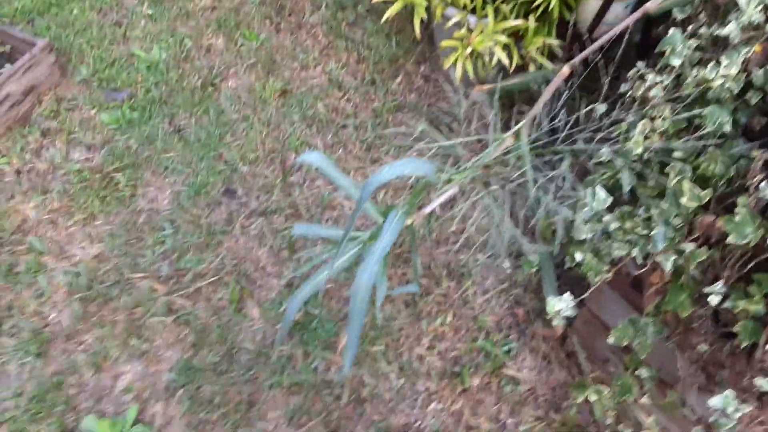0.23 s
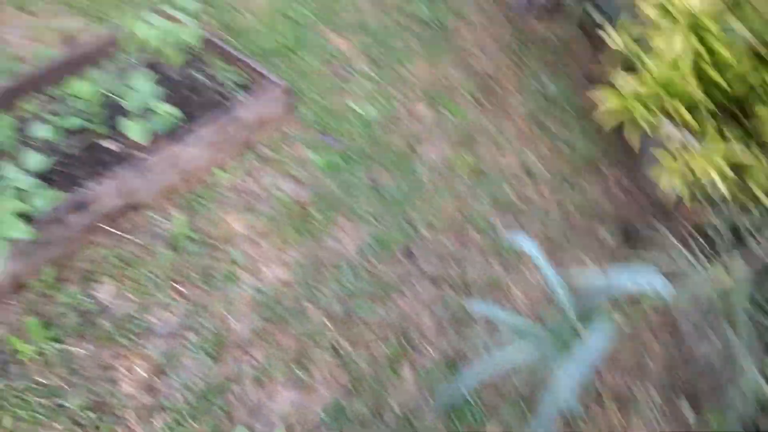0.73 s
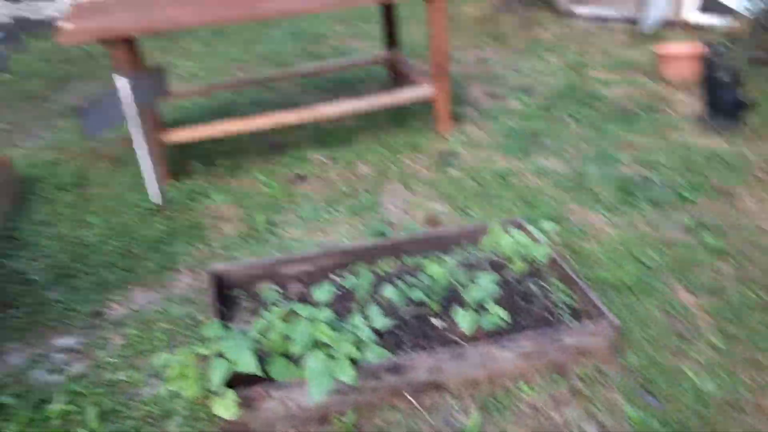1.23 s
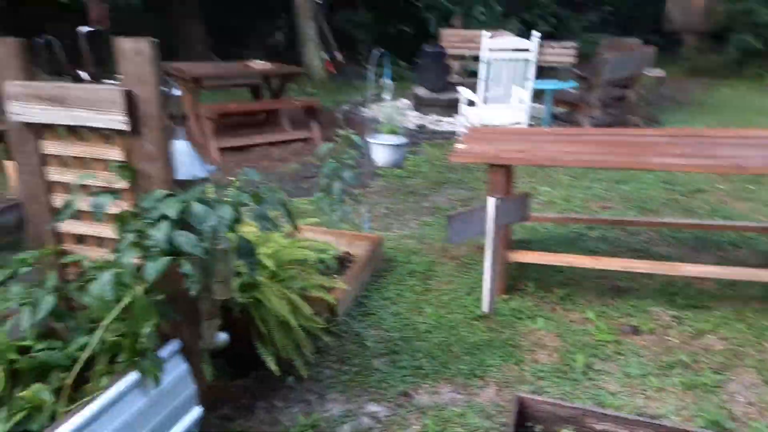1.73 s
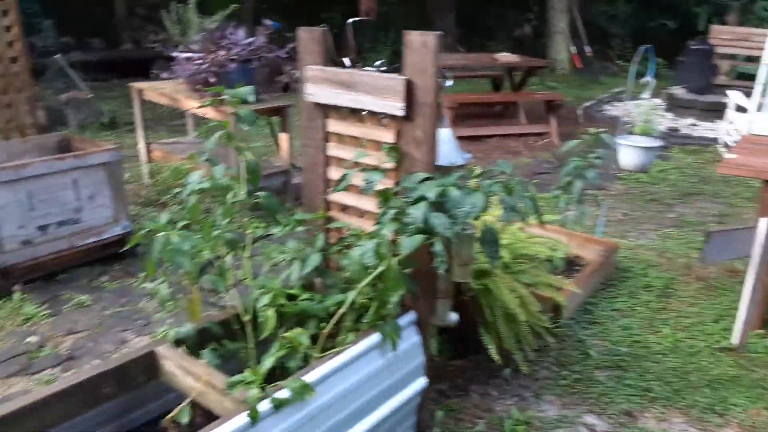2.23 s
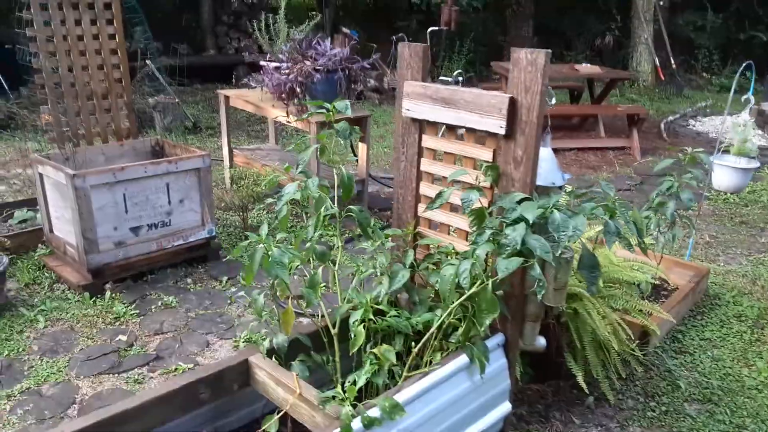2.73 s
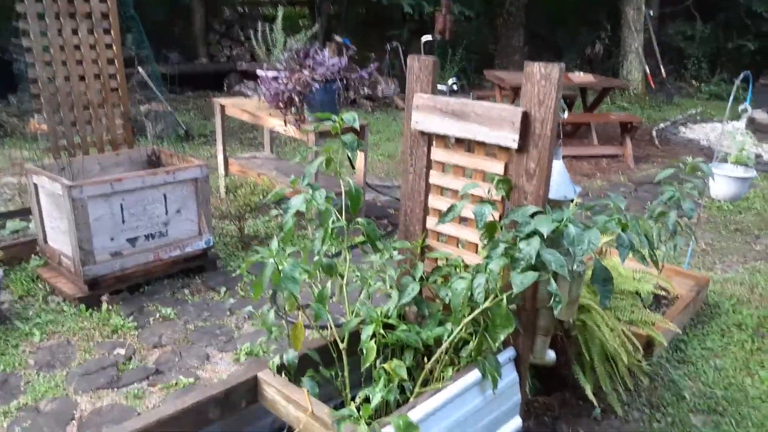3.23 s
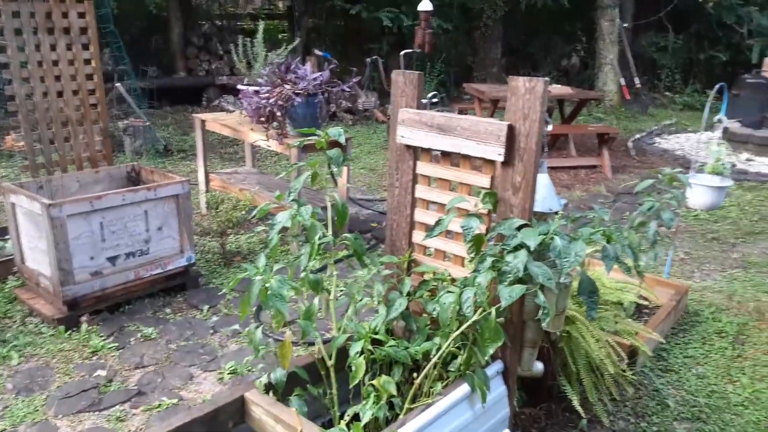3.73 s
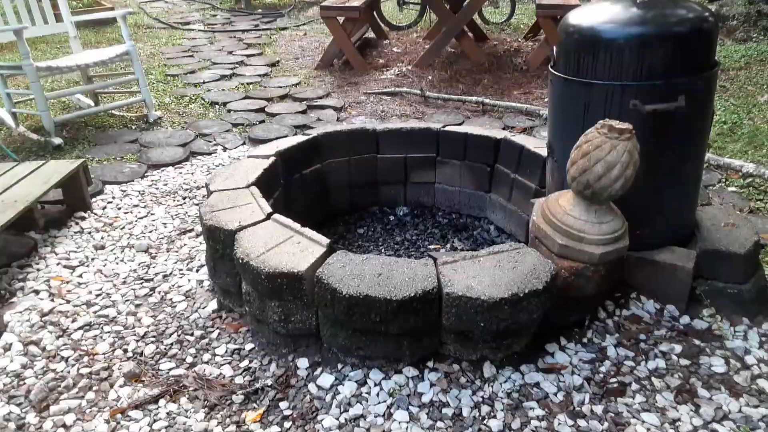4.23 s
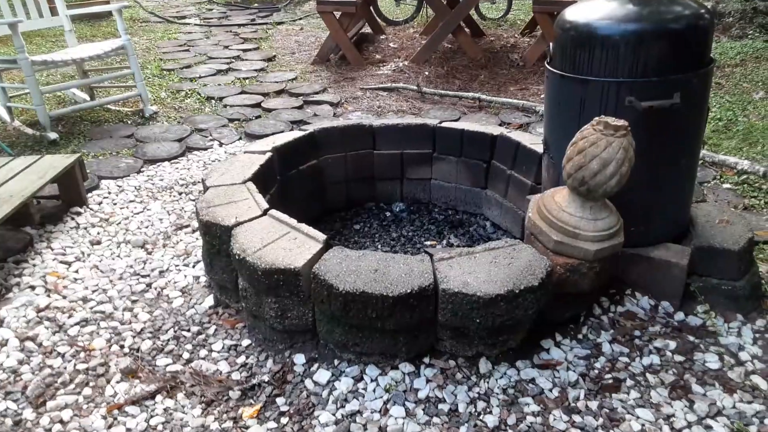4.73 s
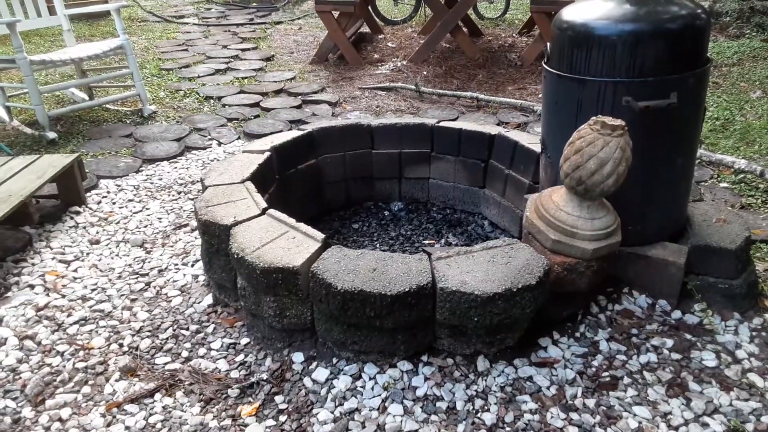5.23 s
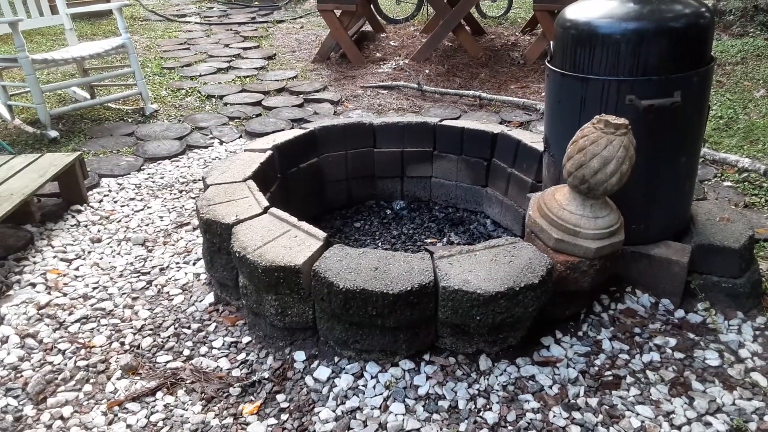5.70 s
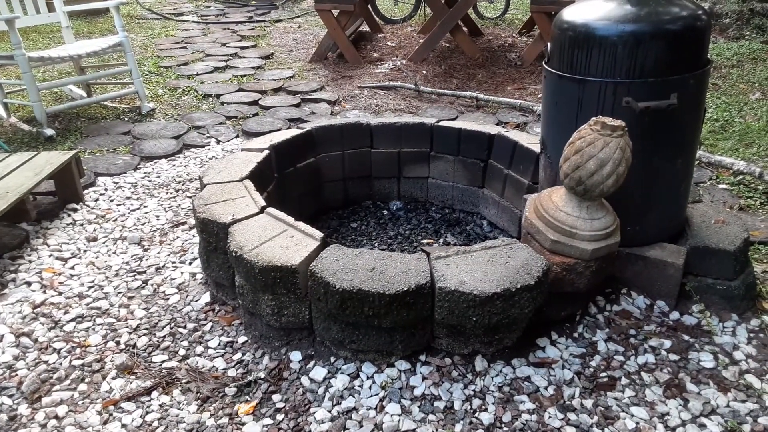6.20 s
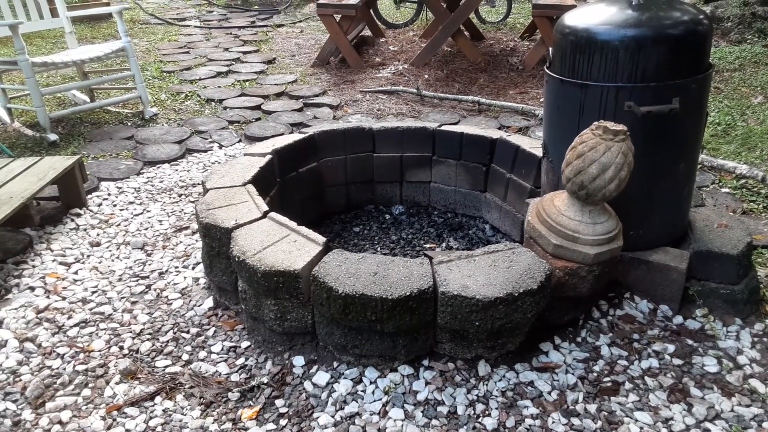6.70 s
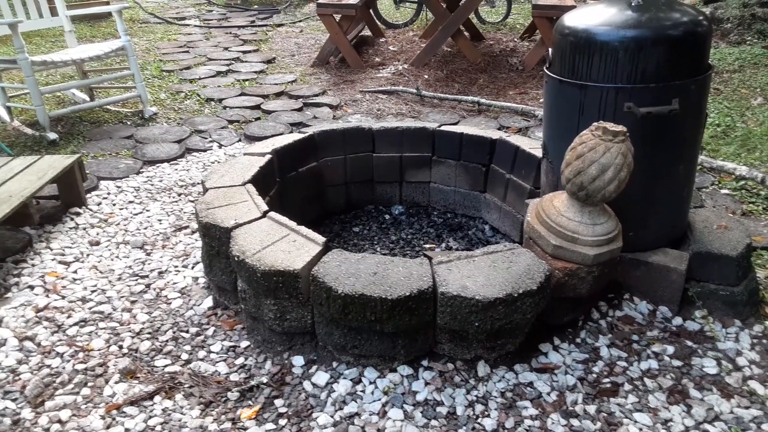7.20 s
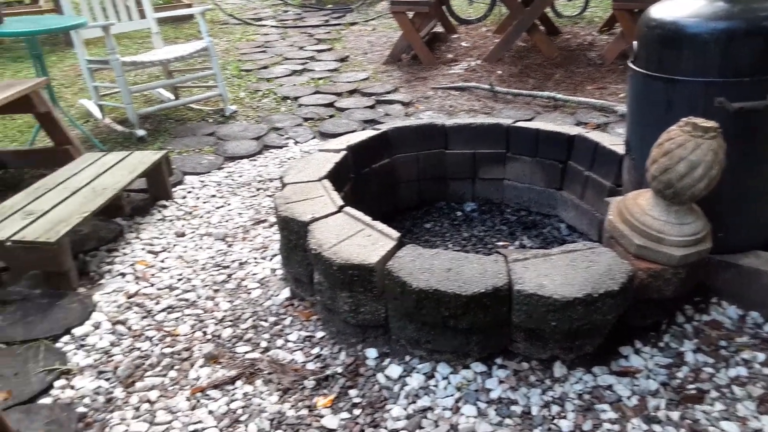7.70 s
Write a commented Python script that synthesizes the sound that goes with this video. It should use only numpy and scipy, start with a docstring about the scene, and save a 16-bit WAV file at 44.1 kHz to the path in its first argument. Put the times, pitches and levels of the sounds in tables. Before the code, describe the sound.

A garden heard through a handheld stereo microphone. From 0 s a soft cicada chorus holds a steady hissy band near 6 kHz, rapidly throbbing and slowly building, with a thin higher trill fading above it. Beneath are low distant rumble, airy hush, very faint crickets and hum. Thin high bird twitters come at 0.2, 1.4, 3.0 and 3.8 s, with sharp rising chips at 0.6 and 3.7 s, echoing in trees. Dull handling knocks fall at 0.2, 0.45, 1.5, 2.1, 3.15, 3.3 and 4.1 s, with light scuffs between 0.6 and 3.3 s. At 4.2 s an abrupt cut brings much louder, smoother cicadas and a low drone that swells, then eases. Twitters sound at the cut, a double knock at 5.0, brighter twitters at 5.6 and 5.9, the loudest chip at 5.7, faint far buzzes at 5.7 and 6.7, tiny ticks at 6.8 and 7.4, and a last twitter at 7.1 s. Cicadas continue to the end, about 8 s.

```python
"""A chorus of cicadas in garden trees, throbbing noise bands heard from one spot, then after an abrupt
cut from a second, louder spot. Small birds call over it: runs of thin two-voiced notes, three sharp
rising chips and two far buzzes, sung as swept sines and echoed by the trees. Shaped noise makes a low
rumble, a drone, open air and far crickets; wavering sines make a faint hum. The hand-held microphone
picks up soft knocks (decaying case modes), scuffs (grainy noise) and tiny ticks."""
import sys
import numpy as np
from scipy import signal
from scipy.fft import rfft, irfft, next_fast_len
from scipy.io import wavfile
from scipy.ndimage import uniform_filter1d

SR = 44100
rng = np.random.default_rng(int(sys.argv[2]) if len(sys.argv) > 2 else 0)


def generate_wav(signal):
    """Clip the signal to [-1, 1] and save it as 16-bit WAV at the path in sys.argv[1]."""
    frames = np.transpose(np.atleast_2d(signal))
    scaled = np.clip(frames, -1, 1) * 32767
    pcm = np.round(scaled).astype(np.int16)
    wavfile.write(sys.argv[1], SR, pcm)


N = 350595
TIME = np.arange(N) / SR
CUT_S = 4.229  # cut to the second spot


def amp(db):
    """Decibels to gain."""
    return 10 ** (np.asarray(db) / 20)


def unit(x):
    """Scales to rms 1."""
    return x / np.sqrt(np.mean(x ** 2) + 1e-20)


def curve(rows):
    """Interpolates (time_s, value) points at every sample."""
    return np.interp(TIME, *np.transpose(rows))


def sine(hz):
    """Sine that follows a frequency track."""
    return np.sin(2 * np.pi * np.cumsum(hz) / SR)


def filtered(x, order, cutoff_hz, kind="low"):
    """Butterworth filter, low-pass by default."""
    return signal.lfilter(*signal.butter(order, cutoff_hz, kind, fs=SR), x)


def pan(left_minus_right_db):
    """Left and right gains for a level difference, at constant power."""
    gains = amp(np.array([[.5], [-.5]]) * left_minus_right_db)
    return gains / np.sqrt(np.mean(gains ** 2, axis=0))


def add(mix, start_s, sound):
    """Mixes a stereo sound in at a time."""
    part = mix[:, max(round(start_s * SR), 0):][:, :sound.shape[1]]
    part += sound[:, :part.shape[1]]


def wander(rate_hz, size=N):
    """Smooth random drift of about rms 1, with a Gaussian roll-off set by the rate."""
    hz = np.fft.rfftfreq(N, 1 / SR)
    smooth = rfft(rng.standard_normal(N)) * np.exp(-(hz / rate_hz) ** 2)
    return unit(irfft(smooth, N))[:size]


def quiver(count, size):
    """Quick random unsteadiness of about rms 1, averaged over size samples."""
    return unit(uniform_filter1d(rng.standard_normal(SR // 4), size))[:count]


def noise(spectrum, likeness):
    """Stereo noise of a given spectral shape and left-right correlation; its mid has rms 1."""
    size = next_fast_len(N)
    hz = np.fft.rfftfreq(size, 1 / SR) + 1  # +1 avoids log(0)
    points_hz, shape_db = np.transpose(spectrum)
    octaves_outside = abs(np.log2(hz / np.clip(hz, points_hz.min(), points_hz.max())))
    gain_db = np.interp(np.log(hz), np.log(points_hz), shape_db) - 60 * octaves_outside
    a, b = irfft(rfft(rng.standard_normal((2, size))) * amp(gain_db), size)[:, :N]
    pair = np.array([a, likeness * a + np.sqrt(1 - likeness ** 2) * b])
    return pair / pair.mean(0).std()


def rumble():
    """Distant rumble: nearly mono low noise with one lull."""
    # spectrum: pitch_hz, relative_density_db
    rumble_shape = [(22, -31), (34, -29), (42, -14), (58, -1), (80, 1.5), (120, 2), (160, -7), (240, -6),
                    (340, -16), (500, -31.5)]
    # level: time_s, level_db
    rumble_level = [(0, -46), (.6, -49), (2.2, -51), (2.67, -55.5), (2.9, -48), (3.6, -48.5), (6.6, -47.5),
                    (7.95, -49.5)]
    return noise(rumble_shape, 0.99) * amp(curve(rumble_level) + 0.23 * wander(3.7)) * pan(3.9)


def drone_db():
    """Drone level: a quick rise at the cut, then an exponential easing to rest."""
    before_db, top_db, rest_db = -56.5, -42, -50.5
    rise_s, ease_s = .1, 1.66
    age_s = TIME - CUT_S
    eased_db = rest_db + (top_db - rest_db) * np.exp(-np.maximum(age_s, 0) / ease_s)
    return before_db + (eased_db - before_db) * np.clip(age_s / rise_s + .5, 0, 1)


def drone():
    """Low noise band, like far traffic, that swells and eases."""
    # spectrum: pitch_hz, relative_density_db
    drone_shape = [(70, -3), (100, -2), (125, 0.5), (165, -3), (215, -8.5), (290, -23)]
    return noise(drone_shape, 0.91) * amp(drone_db() + 0.79 * wander(6.7)) * pan(2.8)


def open_air():
    """Wide airy noise, narrowed in the bass: long waves reach both ports alike."""
    # spectrum: pitch_hz, relative_density_db
    air_shape = [(150, 11), (400, 2), (750, 0), (1100, -6), (1600, -10), (2800, -12), (3900, -15.5),
                 (4600, -17.5), (7000, -29), (10000, -20.5), (15500, -17.5)]
    # level: time_s, level_db
    air_level = [(0, -57.5), (.45, -55.5), (2.1, -56), (2.5, -58.5), (7.95, -58.5)]
    air = noise(air_shape, 0.0074) * amp(curve(air_level) + .5 * wander(13)) * pan(1.0)
    side = filtered((air[0] - air[1]) / 2, 1, 500, "high")
    return air.mean(axis=0) + np.array([side, -side])


def hum():
    """Faint machine hum: sines wavering in pitch and level, with a set of levels for each spot."""
    # partials: pitch_hz, first_spot_db, second_spot_db
    partials = [(117.8, -57, -64), (214, -57.5, -58.5), (284.8, -70, -66.5)]
    total = np.zeros(N)
    for pitch_hz, first_db, second_db in partials:
        tone = unit(sine(pitch_hz + 0.92 * wander(6.7)))
        level_db = np.where(TIME < CUT_S, first_db, second_db) + 1.45 * wander(4.8)
        total += tone * amp(level_db)
    return total * pan(2.9)


def background():
    """Far rumble and drone, open air and hum."""
    return rumble() + drone() + open_air() + hum()


def crickets():
    """Faint, far chirring: a noise band that comes and goes."""
    # spectrum: pitch_hz, relative_density_db
    cricket_shape = [(3500, -9), (3800, -4.5), (3980, -2.5), (4250, -8), (4600, -7.5)]
    return noise(cricket_shape, .02) * amp(-73 + 1.8 * wander(4.3))


def knock(t, pitch_hz, t60_s, lag_s):
    """Three short modes of the case, reaching the left port after the right."""
    age_s = np.maximum(t - np.array([[lag_s], [0]]), 0)
    modes = [(1, 0.5, 1), (1.5, -2, 0.52), (2.5, -4, 0.42)]  # pitch ratio, level_db, share of t60
    body = 0
    for k, (ratio, mode_db, share) in enumerate(modes):
        decay = amp(mode_db - 60 * age_s / (share * t60_s))
        body = body + (-1) ** k * decay * np.sin(2 * np.pi * pitch_hz * ratio * age_s)
    return body


def knocks():
    """Dull knocks that travel through the case from port to port, each with a noisy tick."""
    # start_s, level_db, pitch_hz, t60_s, tick_db (relative), left_minus_right_db, left_lag_s
    knock_rows = [(.203, -30.5, 300, 0.027, -20, 6, 0.00073), (.45, -32.5, 280, 0.021, -11.5, 14, .0004),
                  (1.462, -23, 352, .015, -14.5, -3, .0012), (2.081, -21.5, 279, .024, -32, 31, .0003),
                  (3.147, -20, 370, 0.02, -24.5, 4, .0014), (3.286, -28, 313, 0.027, -26, 10, .0002),
                  (3.304, -25, 272, .02, -23, 8, 0.00073), (4.111, -25, 366, 0.016, -12.5, 4, 0.0014),
                  (4.969, -30.5, 328, 0.02, -17, -7, .0002), (4.976, -29.5, 371, .06, -18, 9, 0.00044)]
    out, t = np.zeros((2, N)), np.arange(SR // 8) / SR
    for start_s, level_db, pitch_hz, t60_s, tick_db, side_db, lag_s in knock_rows:
        body = knock(t, pitch_hz, t60_s, lag_s)
        tick = filtered(rng.standard_normal((2, len(t))), 1, 900)
        tick = signal.lfilter(*signal.butter(1, 900, fs=SR), rng.standard_normal((2, len(t))))
        tick = tick * amp(tick_db + 10.5 - 60 * t / 0.043)
        add(out, start_s, amp(level_db) * (body + tick) * pan(side_db))
    return out


def scuffs():
    """Grainy rubbing: sparse strong grains over weak noise, with bass shared through the case."""
    # start_s, length_s, level_db, slope_db_per_octave, left_minus_right_db
    scuff_rows = [(0.581, .083, -56.5, -7.5, 11), (0.94, 0.21, -57, -2, 3), (1.174, 0.068, -55, 0, -8),
                  (1.45, 0.065, -52.5, -7, -8), (1.716, 0.099, -46, -9, 4), (1.939, 0.32, -57.5, -2.5, 5),
                  (2.21, 0.078, -56, -.5, 2), (3.286, .048, -47, -2, -3)]
    out = np.zeros((2, N))
    hz = np.fft.rfftfreq(SR, 1 / SR) + 1
    shared = np.exp(-hz / 900)  # the case carries the low part to both ports
    for start_s, length_s, level_db, slope_db, side_db in scuff_rows:
        roughness = 0.12 + (rng.random((3, SR)) < .008)
        grains = rng.standard_normal((3, SR)) * roughness * amp(2.0 * wander(60, size=SR))
        grains = rfft(grains)
        colour = amp(slope_db * np.log2(np.hypot(1, hz / 450)))
        colour = colour / np.hypot(1, (220 / hz) ** 2) / np.hypot(1, hz / 5000)
        rub = irfft((grains[:2] * np.sqrt(1 - shared) + grains[2] * np.sqrt(shared)) * colour, SR)
        u = np.linspace(0, 1, int(length_s * SR))
        rub = unit(rub[:, :len(u)] * np.sqrt(u) * (1 - u))
        add(out, start_s, amp(level_db) * rub * pan(side_db))
    return out


def ticks():
    """Tiny dry ticks: fast-decaying, high-passed noise."""
    # start_s, level_db (before the high-pass)
    tick_rows = [(.205, -47), (1.18, -46), (1.461, -44), (3.147, -36), (6.801, -39), (7.424, -40)]
    out, t = np.zeros((2, N)), np.arange(SR // 8) / SR
    for start_s, level_db in tick_rows:
        snap = rng.standard_normal((2, len(t))) * amp(level_db - 60 * t / 0.012)
        add(out, start_s, filtered(snap, 1, 4000, "high"))
    return out


def handling():
    """Sounds of the hand-held microphone."""
    return knocks() + scuffs() + ticks()


def trees(x, direct_db, near_db, tail_db, t60_s):
    """Direct sound, sparse echoes from ground and furniture, and a long, duller scatter from the trees."""
    t = np.arange(SR) / SR
    signs = rng.choice([-1., 1.], (2, SR))
    # random echoes at 700 and 2500 per second
    near = signs * (rng.random((2, SR)) < 700 / SR) * amp(-60 * t / 0.09) * (t > .001)
    tail = signs * (rng.random((2, SR)) < 2500 / SR) * amp(-60 * t / t60_s) * (1 - np.exp(-t / 0.016))
    near, tail = (h / np.linalg.norm(h, axis=1, keepdims=True) for h in (near, tail))
    echo = amp(near_db) * near + amp(tail_db) * filtered(tail, 1, 12000)
    echo[0, 1] += amp(direct_db)  # the right port is reached first
    echo[1, 0] += amp(direct_db)
    return signal.fftconvolve(x, echo, axes=1)[:, :N]


def note(length_s, upper_hz, lower_hz, level_db, rasp_db):
    """Both sides of the syrinx sing an arch; their coupling adds sum and difference tones, and some rasp."""
    growth_db_per_db, even_db = 0.28, -22  # louder notes gain overtones; no change at even_db
    u = np.linspace(0, 1, int(length_s * SR))
    arch = 1 - 0.135 * (u - .65) ** 2
    high, low = (2 * np.pi * np.cumsum(hz * arch * (1 + 0.0098 * quiver(len(u), size=20))) / SR
                 for hz in (upper_hz, lower_hz))
    voices = np.sin(high) + amp(-7.0) * np.sin(low)
    coupled = amp(-16) * np.sin(high + low) + amp(-21) * np.sin(2 * low)
    coupled += amp(-16.5) * np.sin(2 * high - low) + amp(-12) * np.sin(3 * low - high)
    rasp = unit(filtered(quiver(len(u), size=2), 3, 6000, "high"))
    sung = voices + coupled * amp(growth_db_per_db * (level_db - even_db))
    sound = sung * (1 + 0.2 * quiver(len(u), size=70)) + amp(rasp_db) * rasp
    return amp(level_db) * unit(sound * signal.windows.tukey(len(u), .5))


def run_of_notes(start_s, notes, gap_s, first_hz, last_hz, lower_hz, first_db, last_db, rasp_db):
    """Like notes that slow down while pitch and level settle; yields each one's time and sound."""
    length_s, slowing, settling = 0.0452, 1.2, .35  # most change comes after the first note
    scatter_s, scatter_hz = 0.0036, 60
    for k, u in enumerate(np.linspace(0, 1, notes) ** settling):
        longer, higher = rng.uniform(-1, 1, 2)
        yield start_s, note(length_s + scatter_s * longer, first_hz + u * (last_hz - first_hz),
                            lower_hz + scatter_hz * higher, first_db + u * (last_db - first_db), rasp_db)
        start_s += gap_s * slowing ** k


def chip(length_s, start_hz, end_hz, level_db, octave_db):
    """Upward sweep that levels off as it grows loud and ends in a flick, with a trace of its octave."""
    u = np.linspace(0, 1, int(length_s * SR))
    flick = .09 * u ** 12
    sweep_hz = start_hz + (end_hz - start_hz) * u ** .47
    hz = sweep_hz * (1 + flick + 0.0087 * u * quiver(len(u), size=25))
    phase = 2 * np.pi * np.cumsum(hz) / SR
    effort = np.interp(u, [0, .05, .35, .55, .8, 1], [0.2, 0.25, 0.59, 0.78, 0.99, 0.14])
    octave = amp(octave_db) * np.sin(2 * phase) * signal.windows.tukey(len(u), .3) * (1 - u)
    return amp(level_db) * unit(effort * np.sin(phase) + octave)


def buzz(length_s, pitch_hz, level_db):
    """Soft buzzy call: a sine with fast random unsteadiness of pitch and level."""
    count = int(length_s * SR)
    tone = sine(pitch_hz * (1 + 0.05 * quiver(count, size=35)))
    rough = tone * (1 + 0.96 * quiver(count, size=150))
    return amp(level_db) * unit(rough * np.hanning(count))


def birds():
    """Three birds at different distances, each with its own balance of direct sound and echo."""
    # start_s, notes, first_gap_s, upper_first_hz, upper_last_hz, lower_hz, first_db, last_db, rasp_db
    run_rows = [(.213, 3, .068, 8450, 8330, 7170, -44, -38, -11),
                (1.447, 3, 0.09, 8030, 8250, 6890, -43.5, -47.5, -19),
                (2.97, 3, 0.077, 8000, 8370, 7100, -49, -40, -17),
                (3.841, 2, .086, 8160, 8190, 7360, -45.5, -43, -17),
                (4.058, 2, 0.083, 8120, 8000, 7320, -42.5, -43, -20),
                (4.222, 2, .086, 8130, 8360, 7110, -38, -34.5, -29),
                (5.611, 3, .08, 8110, 8470, 6920, -37.5, -33.5, -28),
                (5.919, 2, 0.082, 8260, 7850, 6830, -34, -33, -33),
                (7.064, 3, 0.084, 8000, 8160, 7000, -39, -42, -22)]
    # start_s, length_s, start_hz, end_hz (before the flick), level_db, octave_db
    chip_rows = [(0.573, 0.036, 5900, 8390, -25.5, -14), (3.676, 0.037, 5910, 8430, -27.5, -14),
                 (5.728, .04, 5400, 8340, -20.5, -15)]
    # start_s, length_s, pitch_hz, level_db
    buzz_rows = [(5.689, .1, 3610, -57.5), (6.674, .12, 3520, -57)]
    thin, sharp, far = np.zeros((3, 2, N))
    for row in run_rows:
        for start_s, sound in run_of_notes(*row):
            add(thin, start_s, sound * pan(-4.0))
    for start_s, *shape in chip_rows:
        add(sharp, start_s, chip(*shape) * pan(-5.0))
    for start_s, *shape in buzz_rows:
        add(far, start_s, buzz(*shape) * pan(7))
    return (trees(thin, direct_db=-6.5, near_db=-4.0, tail_db=-2.0, t60_s=0.44)
            + trees(sharp, direct_db=-7.5, near_db=-7, tail_db=-8, t60_s=0.6)
            + trees(far, direct_db=-5.5, near_db=-18, tail_db=-6.5, t60_s=0.3))


def throb(rate_hz, depth, drift):
    """Loudness ripple of an insect's slightly uneven pulse train, at rms 1."""
    turns = np.cumsum(rate_hz * (1 + drift * wander(2.74))) / SR
    return unit(1 + depth * np.cos(2 * np.pi * turns))


def cicadas():
    """Many drumming tymbals merge into a band and its octave; the nearest ones show their pulses."""
    # spectra at the first and second spot, and of a higher, thinner trill: pitch_hz, relative_density_db
    soft_shape = [(4400, -38.5), (5000, -16.5), (5450, -6), (6050, 1.5), (6400, -5), (6900, -28.5),
                  (7600, -29), (9500, -54), (10500, -28.5), (11700, -17), (12600, -24), (13400, -32)]
    loud_shape = [(4500, -41), (4950, -20), (5350, -6), (5900, 1), (6250, -1.5), (6850, -22), (7500, -30),
                  (8300, -35), (9700, -50), (10900, -20.5), (11750, -13), (12400, -19.5), (13400, -39)]
    trill_shape = [(7200, -47), (7900, -8.5), (8350, -8), (8650, 2), (9050, -5.5), (9450, -23)]
    soft_db, build_db_per_s, loud_db = -52.5, 0.58, -43.5
    trill_first_db, fade_db_per_s, trill_second_db = -59, 0.83, -66

    soft = noise(soft_shape, .02) * amp(soft_db + build_db_per_s * TIME + 0.14 * wander(14)) * pan(-3.0)
    soft *= throb(81.8, depth=.23, drift=.005) * throb(163, depth=.12, drift=.008)
    loud = noise(loud_shape, .02) * amp(loud_db + .5 * wander(21)) * pan(-3.5)
    loud *= throb(183, depth=0.081, drift=0.0194)
    trill = noise(trill_shape, .02) * throb(82, depth=0.11, drift=0.03)
    first_spot = soft + trill * amp(trill_first_db - fade_db_per_s * TIME) * pan(-4.0)
    second_spot = loud + trill * amp(trill_second_db) * pan(-2.7)
    return np.where(TIME < CUT_S, first_spot, second_spot)


def scene():
    """The whole garden."""
    return background() + crickets() + handling() + birds() + cicadas()


def record(dry):
    """The recorder's band limit: a steep linear-phase low-pass."""
    edge_hz = 15760
    lowpass = signal.firwin(1023, edge_hz, window=("kaiser", 9), fs=SR)
    return signal.oaconvolve(dry, lowpass[None], "same")


dry = scene()
out = record(dry)
generate_wav(out)
```